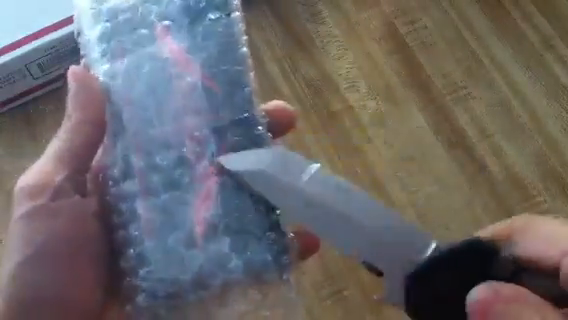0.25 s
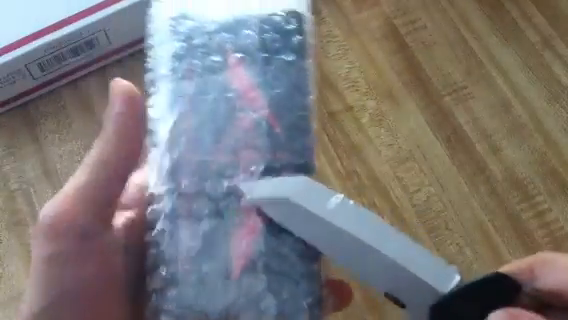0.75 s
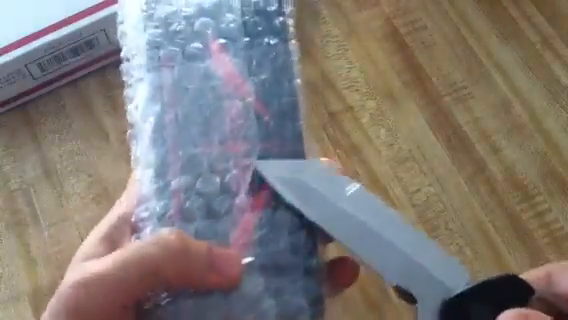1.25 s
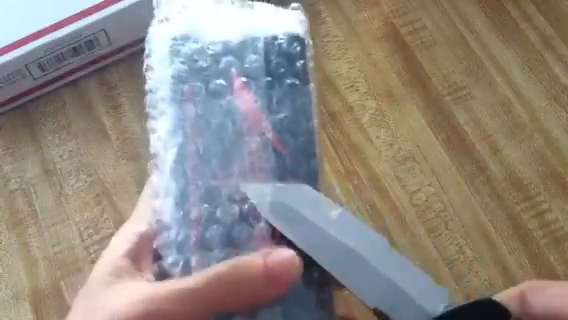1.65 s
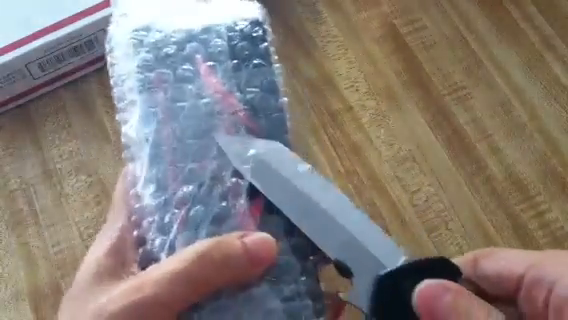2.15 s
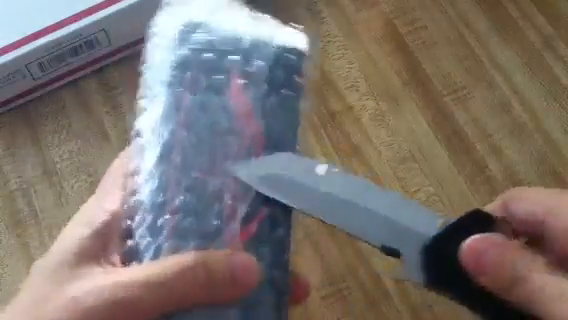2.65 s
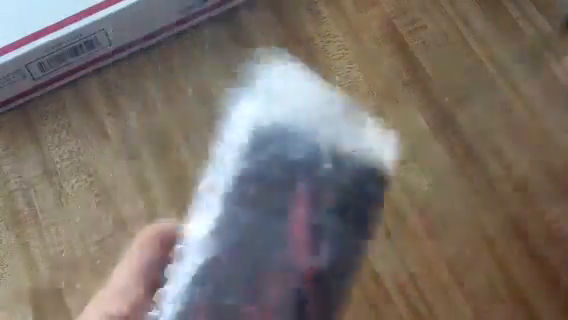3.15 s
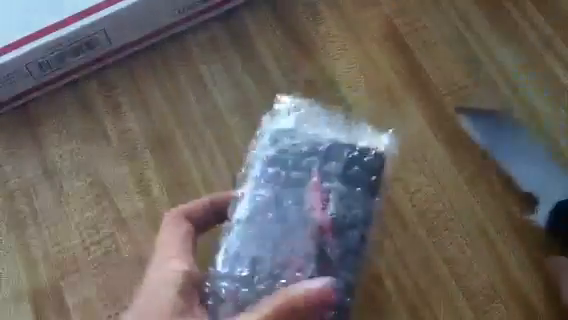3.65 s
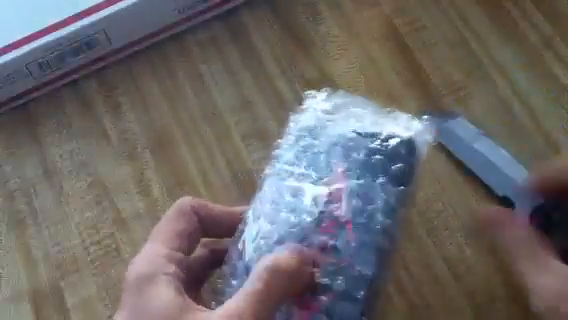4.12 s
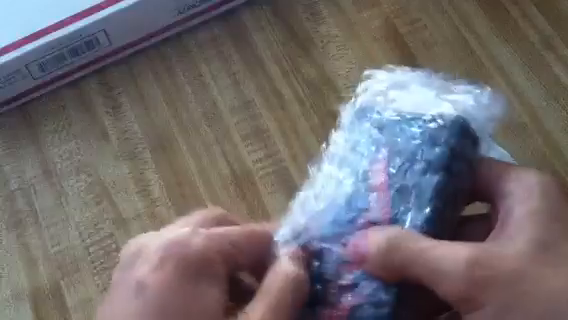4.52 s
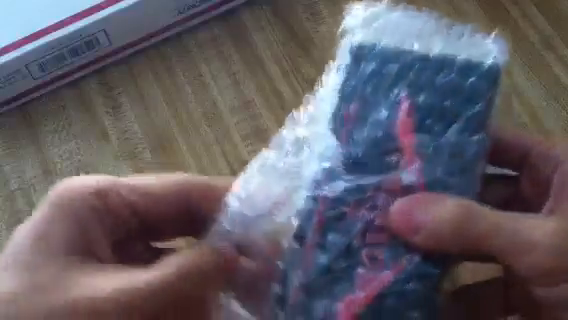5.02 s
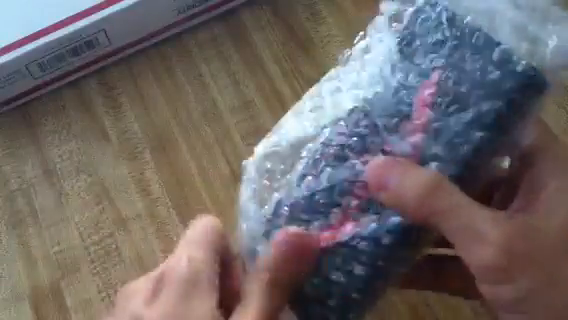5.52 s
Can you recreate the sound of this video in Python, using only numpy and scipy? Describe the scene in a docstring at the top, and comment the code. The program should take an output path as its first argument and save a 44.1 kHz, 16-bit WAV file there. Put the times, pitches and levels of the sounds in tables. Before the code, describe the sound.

A close, dry handling sound in a small room with faint steady hiss and low hum. From 0 to 0.9 seconds bubble wrap rustles very softly in short strokes as a knife tip touches it. At about 1.0 a crisp snap with a dull little bump stands out, followed by brief crinkles. From 1.8 to 2.9 small ticks and fine scratchy pricks come irregularly over the taut film. At 3.0 to 3.1 the blade breaks through in a sharp cluster of crackles with a soft thud. Quieter rustling continues; light taps at 3.7, then wooden knocks and clacks at 3.9 to 4.1 as the knife is laid on the table, with a short rattle. Hands take over, crinkling harder, and the loudest dense snapping and ripping comes at 4.6 to 5.0. It eases around 5.2 to 5.5, then crackles strongly again from 5.55 to the end.

```python
"""Knife and hands open bubble wrap

A knife tip pokes and slits the wrap round a small object, close by in a small room; the knife is laid on
a wooden table, then both hands pull the wrap open. Buckling film is impulses and flutter through resonances;
bubbles and table are decaying sines; bumps, clacks, room noise and hum are shaped noise.
"""
import sys
import numpy as np
from scipy import signal
from scipy.fft import rfft, irfft
from scipy.io import wavfile

SR = 44100
rng = np.random.default_rng(int(sys.argv[2]) if len(sys.argv) > 2 else 0)


def digitize_waveform(pressure):
    """Quantize a signal to 16-bit integers and store it at the path in sys.argv[1].

    Rows of a 2-D input are taken as channels; values are limited to [-1, 1].
    """
    field = np.atleast_2d(pressure).T
    bounded = np.clip(field, -1, 1)
    quanta = np.round(bounded * 32767).astype(np.int16)
    wavfile.write(sys.argv[1], SR, quanta)


N = 254898
KNIFE_END_S = 3.38  # the knife leaves the film and the fingers take over


def gain_of(db):
    """Decibels to an amplitude factor."""
    return 10 ** (np.asarray(db) / 20)


def evened(x):
    """Scales to rms 1."""
    return x / np.sqrt(np.mean(x ** 2) + 1e-20)


def read(points, hz):
    """Reads a table on a log-frequency axis."""
    f, value = np.transpose(points)
    return np.interp(np.log(hz + 1), np.log(f + 1), value)


def add(mix, s, sound):
    """Mixes a sound in at a time in seconds, cut off at the end of the mix."""
    part = mix[max(round(s * SR), 0):][:len(sound)]
    part += sound[:len(part)]


def coloured(x, points, size=4096):
    """Minimum-phase filter with the given spectrum, so that clicks keep their sharp front."""
    hz = abs(np.fft.fftfreq(size, 1 / SR))
    log_gain = np.log(gain_of(read(points, hz)))
    spectrum = np.exp(np.conj(signal.hilbert(log_gain)))
    taps = np.fft.ifft(spectrum).real[:size // 2]
    return signal.oaconvolve(x, taps)[:len(x)]


def ring(x, hz, q):
    """One damped resonance, gain 1 at its centre."""
    w = 2 * np.pi * min(hz, SR / 2 - 1000) / SR
    a = np.sin(w) / (2 * q)
    return signal.lfilter([a, 0, -a], [1 + a, -2 * np.cos(w), 1 - a], x)


def buckle(hz, push_db, flutter, flutter_s, q, push_hz=600, push_q=0.69, size=700):
    """A crease flips: an impulse and brief flutter ring the crease and push the sheet round it."""
    t = np.arange(size) / SR
    shiver = rng.standard_normal(size) * np.exp(-t / flutter_s) * (1 - np.exp(-t / .0003))
    drive = evened(1. * (t == 0)) + flutter * evened(shiver)
    crease = evened(ring(drive, hz, q))
    sheet = evened(ring(ring(drive, push_hz, push_q), push_hz, push_q))
    sound = crease + gain_of(push_db) * sheet
    return sound / np.linalg.norm(sound)


def crackle(length, per_s, spread_db, hz, scatter, push_db, count=36):
    """Many tiny creases of different pitch flip at random, a few much harder than the rest."""
    hardness_db = spread_db * np.minimum(rng.exponential(1, length), 4)
    size = gain_of(hardness_db) * rng.choice([-1, 1], length)
    clicks = size * (rng.random(length) < per_s / SR)
    crease = rng.integers(0, count, length)
    pitches = hz * np.exp(scatter * np.linspace(-1, 1, count))
    out = np.zeros(length)
    for k, pitch in enumerate(pitches):
        grain = buckle(pitch, push_db, flutter=.6, flutter_s=.0008, q=1.3)
        out += signal.oaconvolve(clicks * (crease == k), grain)[:length]
    return evened(out)


def air(hiss_db=-62):
    """Steady room noise with a low hum: noise through narrow resonances, so that it wavers."""
    # spectrum of the room noise: (frequency [Hz], relative density [dB per Hz])
    air_colour = [(25, 3), (60, -11), (90, -17), (118, -13.5), (160, 2), (220, -6.5), (350, -6.5),
                  (520, -20.5), (1000, -15), (3000, -22.5), (8000, -21.5), (12000, -49), (16000, -55)]
    # hum: (frequency [Hz], bandwidth [Hz], level [dB])
    hum_bands = [(115, 6.7, -72.5), (156.2, 7.9, -68)]
    hz = np.fft.rfftfreq(N, 1 / SR)
    hiss = evened(irfft(rfft(rng.standard_normal(N)) * gain_of(read(air_colour, hz)), N))
    hum = np.zeros(N)
    for f, width, db in hum_bands:
        hum += gain_of(db) * evened(ring(rng.standard_normal(N), f, f / width))
    return gain_of(hiss_db) * hiss + hum


def motion():
    """How fast the film slides: a stir in the grip, separate pushes of the knife, one long pull of the hands."""
    # separate pushes of blade and thumb over the film: (start [s], length [s], relative level [dB])
    strokes = [(-.02, .11, -53.5), (0.101, 0.075, -59), (0.267, 0.036, -53.5), (0.4, 0.11, -55),
               (0.612, .07, -56.5), (0.69, 0.099, -53), (0.718, 0.33, -54), (1.204, .11, -45.5),
               (1.346, 0.061, -56), (1.502, 0.19, -47.5), (1.673, 0.15, -51.5), (1.77, 0.36, -55),
               (2.206, 0.34, -56.5), (2.553, 0.11, -56), (2.662, 0.16, -56), (2.916, 0.28, -48.5),
               (3.19, 0.14, -55.5)]
    # the hands turn the bundle and pull it open without a pause: (time [s], relative effort [dB])
    pull_curve = [(3.41, -55), (3.8, -53), (4.2, -51), (4.36, -48.5), (4.46, -42), (4.59, -48), (4.8, -38),
                  (5.08, -47), (5.2, -46.5), (5.42, -54), (5.53, -49), (5.61, -44), (5.78, -44)]
    loose_db, firm_db, firm_s = -66, -61, 0.8  # the wrap never quite rests: loose grip, then firm from firm_s
    rise_share, release_s = 0.39, 0.015  # a push builds up over this share of its length, holds, and dies away
    takeover_s = 0.024
    t = np.arange(N) / SR
    takeover = np.clip((t - KNIFE_END_S) / takeover_s, 0, 1)
    pull = gain_of(np.interp(t, *np.transpose(pull_curve))) * takeover
    grip = gain_of(np.where(t < firm_s, loose_db, firm_db))
    power = grip ** 2 + pull ** 2
    for s, length_s, db in strokes:
        swell = np.sin(np.pi / 2 * np.clip((t - s) / (rise_share * length_s), 0, 1)) ** 2
        release = np.exp(-np.maximum(t - s - length_s, 0) / release_s)
        power = power + (gain_of(db) * swell * release) ** 2
    return np.sqrt(power)


def rustle(db=1.5, top_hz=10800):
    """The wrap crackles as fast as the hands move it: coarse where slack, fine where taut."""
    # share of fine crackle in the power: the blade stretches the film, the fingers leave it slacker
    taut = np.where(np.arange(N) / SR < KNIFE_END_S, 0.83, 0.68)
    coarse = crackle(N, per_s=1100, spread_db=2.0, hz=3100, scatter=0.49, push_db=-12.5)
    fine = crackle(N, per_s=1500, spread_db=2.5, hz=6800, scatter=0.44, push_db=-34.0)
    blend = np.sqrt(1 - taut) * coarse + np.sqrt(taut) * fine
    # the rustle is soft in the highest treble
    return signal.lfilter(*signal.butter(2, top_hz, fs=SR), gain_of(db) * motion() * blend)


def small_snaps(db=-4, top_hz=9000):
    """Now and then a larger crease snaps, as hard as the film is being moved, its highest treble softened."""
    ticks = crackle(N, per_s=26, spread_db=2.5, hz=3800, scatter=0.53, push_db=-10.5)
    softened = signal.lfilter(*signal.butter(2, top_hz, fs=SR), ticks)
    return gain_of(db) * motion() * softened


def room(x, first_s=.004, count=3, turn_hz=1.691):
    """Dense reflections, each band dying at its own speed; several echo sets take turns at a steady rate."""
    # decay of the room: (frequency [Hz], time to fall 60 dB [s])
    decay = [(150, 0.47), (400, 0.63), (1000, 0.34), (3000, 0.33), (7000, 0.21), (14000, 0.14)]
    # colour and strength of what the room gives back: (frequency [Hz], gain [dB])
    wet_colour = [(150, -16), (500, -8.5), (1500, -11), (4000, -11.5), (8000, -11), (14000, -17.5)]
    out, clock = np.zeros(N), np.arange(N) / SR
    for k in range(count):
        sparse = rng.standard_normal(SR) * (rng.random(SR) < .25)
        taps = sparse * (np.arange(SR) / SR > first_s)
        hz, t, z = signal.stft(taps, SR, nperseg=256)
        t60 = read(decay, hz)[:, None]
        fading = z * gain_of(-60 * t / t60) / np.sqrt(t60)
        tail = signal.istft(fading, SR, nperseg=256)[1]
        share = np.cos(np.pi * (turn_hz * clock + k / count)) * np.sqrt(2 / count)
        out += signal.fftconvolve(x * share, tail / np.linalg.norm(tail))[:N]
    return coloured(out, wet_colour)


def snaps(db=21.0, bubble_db=-11, bubble_q=12, scatter=0.478):
    """Single large buckles; the harder ones flutter more, and each rings two bubbles beside it."""
    # loud buckles: (time [s], relative level [dB], crease pitch [Hz], dull push of the whole sheet [dB])
    snap_list = [(.139, -44.5, 4900, -17), (0.5017, -40.5, 4600, -16), (.7539, -40, 3600, -23),
                 (0.9942, -24.5, 3100, -12), (1.003, -31.5, 4500, -10.5), (1.2767, -38.5, 3560, -23),
                 (1.8115, -39.5, 6030, -31), (1.9282, -34, 7760, -21), (1.9478, -40, 3100, -18),
                 (1.9544, -33, 5870, -27), (1.9918, -35, 4800, -14), (2.0785, -32.5, 3300, -40),
                 (2.2546, -40, 5770, -8.5), (2.3966, -34, 4140, -22), (2.4182, -42, 6100, -16),
                 (2.516, -37.5, 4170, -10.5), (2.6256, -36.5, 5650, -17), (2.7343, -34.5, 4470, -27),
                 (3.0004, -23.5, 4430, -27), (3.0101, -23.5, 5400, -13), (3.016, -24, 4800, -34),
                 (3.0275, -27, 4000, -28), (3.0633, -21, 4250, -16), (3.0679, -22, 5000, -18),
                 (3.074, -17, 4830, -35), (3.0826, -22, 4030, -11.5), (3.382, -44, 2660, -27),
                 (3.3948, -35.5, 4900, -39), (3.9459, -28, 3920, -6), (4.2542, -33.5, 4840, -6.5),
                 (4.2773, -30.5, 5070, -39), (4.4, -34, 5200, -10.5), (4.4537, -28.5, 4600, -19),
                 (4.6208, -17, 4500, -15), (4.661, -25.5, 5300, -35), (4.6665, -30.5, 5400, -27),
                 (4.7038, -17, 5450, -19.5), (4.7375, -15, 4100, -10), (4.7856, -15.5, 3950, -18),
                 (4.7887, -16.5, 3800, -12.5), (4.7963, -22, 3950, -10), (4.8141, -16, 4700, -30),
                 (4.846, -16, 4070, -12.5), (4.861, -31, 5060, -40), (4.905, -20, 4040, -21),
                 (4.9704, -31, 2820, -5), (4.98, -19, 4500, -44), (5.0164, -35, 1870, 3.5),
                 (5.1748, -34.5, 3100, -23), (5.1955, -29.5, 6200, -41), (5.28, -32.5, 5860, -16),
                 (5.5784, -29, 4770, -13.5), (5.6197, -26.5, 4800, -14), (5.628, -22, 4330, -17),
                 (5.664, -28.5, 4300, -14), (5.693, -30.5, 5370, -14), (5.7026, -23, 4230, -20.5),
                 (5.7569, -26.5, 5800, -27), (5.7729, -19, 7140, -18)]
    # flutter against the first impulse: share at -30 dB in the table, and growth per dB
    flutter_share, flutter_growth = .85, .05
    out = np.zeros(N)
    for s, level_db, hz, push_db in snap_list:
        flutter = flutter_share * np.exp(flutter_growth * (level_db + 30))
        snap = buckle(hz, push_db, flutter, flutter_s=.0012, q=.8)
        bubbles = np.zeros(len(snap))
        for low, high in [(-5.0, 0.074), (-0.029, 1.0)]:  # one mostly below the crease pitch, one mostly above
            bubble_hz = hz * np.exp(scatter * rng.uniform(low, high))
            bubbles += ring(snap, bubble_hz, bubble_q)
        snap = snap + gain_of(bubble_db) * bubbles / np.linalg.norm(bubbles)
        add(out, s, gain_of(level_db + db) * snap / np.linalg.norm(snap))
    return out


def pings():
    """The skin of one flicked taut bubble swings freely for a few milliseconds as a decaying sine."""
    # flicked bubbles: (time [s], relative level [dB], pitch [Hz], time to fall 60 dB [s])
    ping_list = [(0.7535, -44, 3280, 0.041), (2.7328, -50.5, 1450, 0.082), (2.7341, -40.5, 3130, 0.039),
                 (4.6202, -17.5, 3300, 0.012), (4.6215, -29, 6930, 0.018), (4.736, -25.5, 1760, 0.028),
                 (4.8467, -8.5, 6200, 0.0082), (4.905, -46, 1750, 0.013), (4.9796, -23, 4700, 0.014),
                 (5.0455, -38.5, 1020, 0.033)]
    out, t = np.zeros(N), np.arange(SR // 5) / SR
    for s, db, hz, t60 in ping_list:
        add(out, s, gain_of(db - 60 * t / t60) * np.sin(2 * np.pi * hz * t))
    return out


def jolts(q=0.99):
    """Dull noise bumps of the wrapped object, cushioned by the bubbles and the hand."""
    # the blade gives way and the object jerks: (time [s], length [s], level [dB], pitch [Hz])
    jolt_list = [(0.991, 0.023, -55, 333), (2.072, 0.034, -49, 355), (3.056, .045, -42.5, 243)]
    out = np.zeros(N)
    for s, length_s, db, hz in jolt_list:
        push = rng.standard_normal(int(length_s * SR))
        bump = ring(ring(np.pad(push, (0, 1500)), hz, q), hz, q)
        add(out, s, gain_of(db) * bump * np.sqrt(len(push)) / np.linalg.norm(bump))
    return out


def rips():
    """A crease runs or the blade rips through: short dense runs of buckling."""
    # runs: (time [s], length [s], relative level [dB], middle pitch [Hz])
    rip_list = [(2.085, 0.018, -35.5, 4600), (2.995, 0.035, -37, 4500), (3.03, .035, -28.5, 6900),
                (3.059, 0.038, -26, 4440), (3.161, 0.026, -42, 2720), (3.945, 0.029, -38.5, 4000),
                (4.12, .031, -36.5, 3780), (4.718, 0.047, -36, 5040), (4.785, 0.0157, -24, 3450),
                (4.806, 0.0092, -23.5, 3970), (4.818, 0.017, -38, 6000), (5.556, .035, -36.5, 5150),
                (5.611, .049, -33, 5540)]
    out = np.zeros(N)
    for s, length_s, db, hz in rip_list:
        run = crackle(int(length_s * SR), per_s=2600, spread_db=2.5, hz=hz, scatter=0.72, push_db=-16.5)
        add(out, s, gain_of(db) * run * signal.windows.tukey(len(run), .25))
    return out


def pricks(start_s=2.14, end_s=2.83, db=-60, hz=7500):
    """The knife tip creeps over the taut film in tiny separate ticks."""
    out = np.zeros(N)
    length = int((end_s - start_s) * SR)
    ticks = crackle(length, per_s=55, spread_db=2.5, hz=hz, scatter=.2, push_db=-30)
    add(out, start_s, gain_of(db) * evened(ring(ticks, hz, 1.)))
    return out


def knocks(db=-26, low_hz=450, baffle_hz=160):
    """Each blow rings table and blade with a clack, crack and rattle; a softer contact dulls them all."""
    # the knife meets the table: (time [s], relative level [dB], hardness as a low-pass corner [Hz],
    # weight of the handle on the low modes [dB], ring of the blade [dB])
    blows = [(3.7146, -19.5, 4170, -1.5, 7.5), (3.753, -26, 5000, -1, 6), (3.9321, 0.5, 484, -2, -18),
             (3.9461, -6, 600, 0, -6), (4.0225, 2.5, 2310, 2, -30), (4.0483, 2, 4830, -12.5, -4),
             (4.0831, -6, 5000, -3, -4)]
    # modes of the table top: (frequency [Hz], relative level [dB], time to fall 60 dB [s])
    table_modes = [(160, -46, .14), (217.3, -4.5, 0.26), (283, 0.5, 0.11), (303, -3.5, 0.076),
                   (360, -7, 0.16), (478, -6, 0.091), (503, -4, 0.066), (571, -7, 0.049), (614, -7, 0.1),
                   (691, -7.5, 0.15), (743, -5, 0.15), (800, -9, 0.17), (1046, -11, 0.084),
                   (1470, -21, .12), (1523, -10, 0.25), (1693, -12, 0.099), (1840, -5, 0.043),
                   (1880, -15, 0.12), (2570, -9, 0.043), (2920, -20, .1), (3090, -11, .1),
                   (3500, -21, 0.068)]
    # the knife, damped by the hand: (frequency [Hz], relative level [dB], time to fall 60 dB [s])
    blade_modes = [(846, -0.5, 0.11), (893, -7, 0.064), (1643, -7, 0.12), (2420, -3, 0.028),
                   (4430, 6, 0.019), (4360, 2, 0.022)]
    # the crowd of short-lived modes of board and handle: (frequency [Hz], relative density [dB per Hz])
    clack_colour = [(80, -33.5), (160, -11), (230, 6), (450, -1.5), (800, -1), (1200, -3.5), (1700, -4),
                    (2500, -6), (4500, -10.5), (5400, -14.5), (9000, -17), (15000, -31)]
    # relative level [dB] and decay [s] of each noise part
    clack_db, clack_s = 4, 0.0056
    rattle_db, rattle_s = -3.5, .042  # the knife rattles on the wood
    crack_db, crack_s = 8, 0.0017
    out, t = np.zeros(N), np.arange(SR // 2) / SR
    hz, mode_db, t60 = np.transpose(table_modes)[:, :, None]
    ringing = gain_of(mode_db - 60 * t / t60) * np.sin(2 * np.pi * hz * t)
    blade = np.zeros(len(t))
    for f, ring_db, ring_s in blade_modes:
        blade += gain_of(ring_db - 60 * t / ring_s) * np.sin(2 * np.pi * f * t)
    for s, level_db, hard_hz, weight_db, blade_db in blows:
        # each mode starts up or down at this spot
        place = rng.choice([-1, 1], hz.shape) * gain_of(weight_db / (1 + (hz / low_hz) ** 4))
        place = np.where(hz < low_hz, abs(place), place)  # the lowest modes all start with the push
        modes = (place * ringing).sum(0)
        fade = gain_of(clack_db) * np.exp(-t / clack_s) + gain_of(rattle_db) * np.exp(-t / rattle_s)
        clack = evened(coloured(rng.standard_normal(len(t)), clack_colour)) * fade
        # only a hard contact lets the crack through
        crack = gain_of(crack_db) * rng.standard_normal(len(t)) * np.exp(-t / crack_s)
        blow = modes + clack + crack + gain_of(blade_db) * blade
        contact = signal.butter(2, min(hard_hz, SR / 4), fs=SR)
        add(out, s, gain_of(level_db + db) * signal.lfilter(*contact, blow))
    # the board is too small to radiate deep bass
    return signal.sosfilt(signal.butter(6, baffle_hz, "high", fs=SR, output="sos"), out)


def scene(table_wet_db=3):
    """The wrap is near; the table spreads more of its sound into the room."""
    # colour of the film as the microphone picks it up: (frequency [Hz], gain [dB])
    picked_up_colour = [(90, -25), (200, 3.5), (380, -3.5), (600, -6.5), (1100, 6), (1700, 2.5),
                        (2400, -0.5), (3300, 1), (4700, -0.5), (5400, -6), (6700, -2), (9500, -1.5),
                        (12000, -3), (14000, -6.5), (16000, -20)]
    film = rustle() + small_snaps() + snaps() + pings() + rips() + pricks()
    wrap = coloured(film, picked_up_colour) + jolts()
    table = knocks()
    reflections = room(wrap + gain_of(table_wet_db) * table)
    return (wrap + table + reflections + air())[None]


def record(dry, edge_hz=16300):
    """The microphone sheds the deep bass; then a steep low-pass limits the band."""
    thin = signal.sosfilt(signal.butter(2, 70, "high", fs=SR, output="sos"), dry)
    band_limit = signal.firwin(255, edge_hz, window=("kaiser", 9), fs=SR)
    return signal.oaconvolve(thin, band_limit[None], "same")


dry = scene()
out = record(dry)
digitize_waveform(out)
```